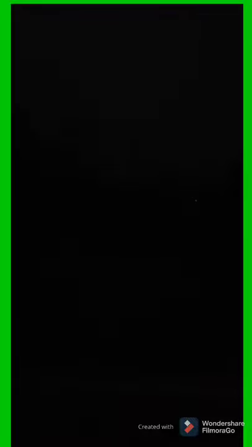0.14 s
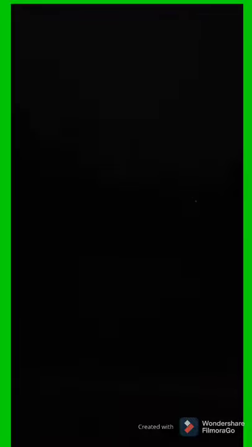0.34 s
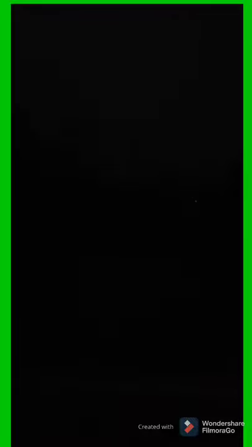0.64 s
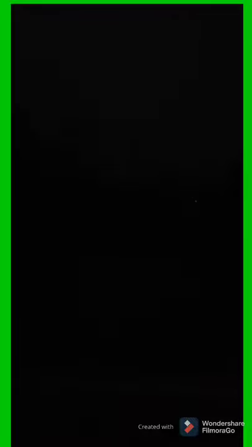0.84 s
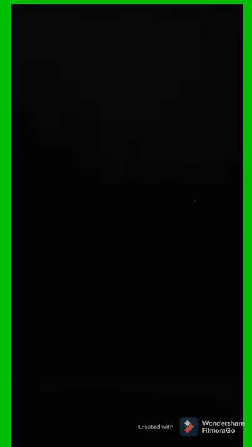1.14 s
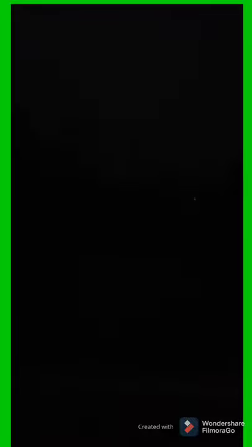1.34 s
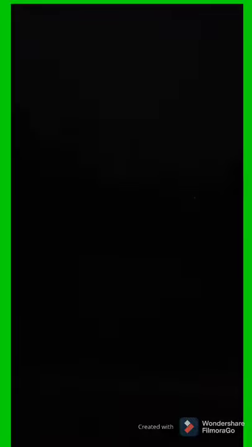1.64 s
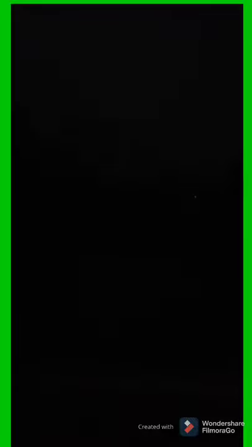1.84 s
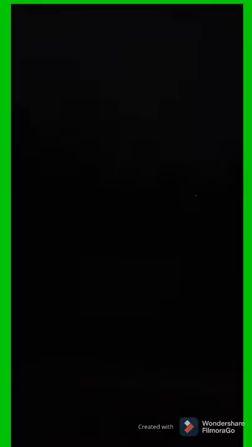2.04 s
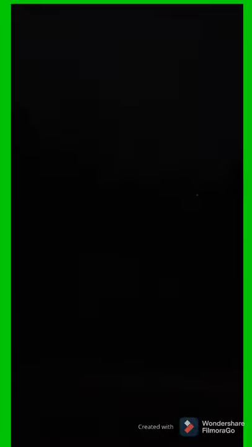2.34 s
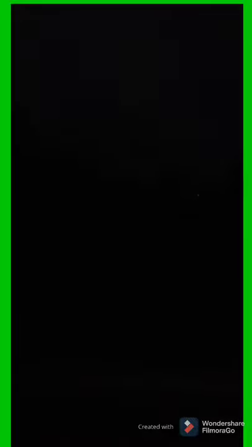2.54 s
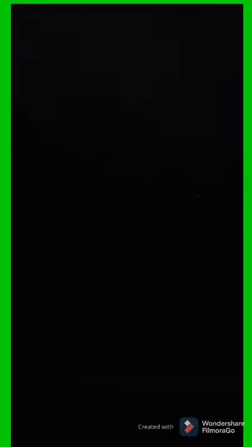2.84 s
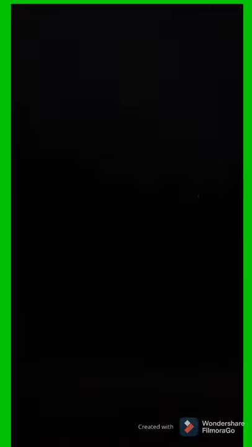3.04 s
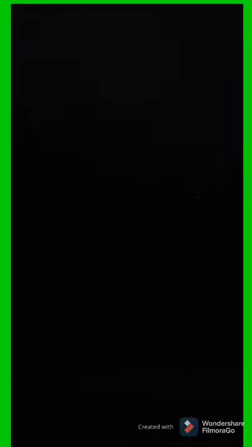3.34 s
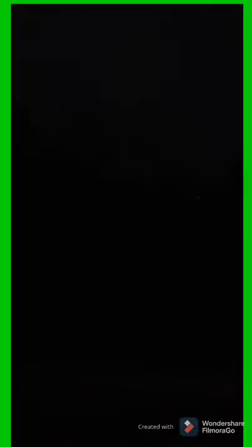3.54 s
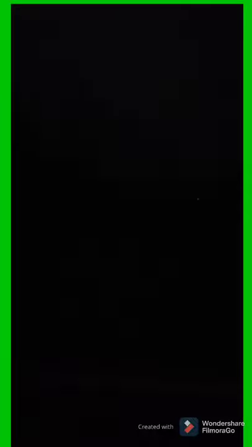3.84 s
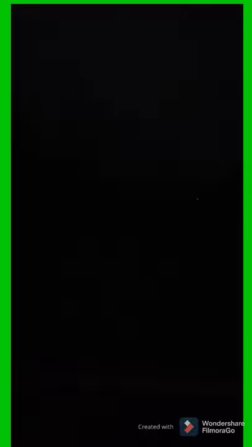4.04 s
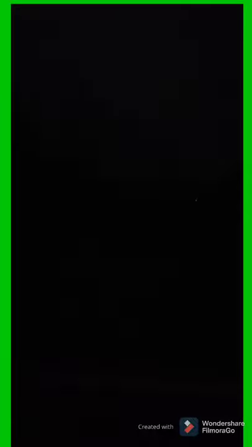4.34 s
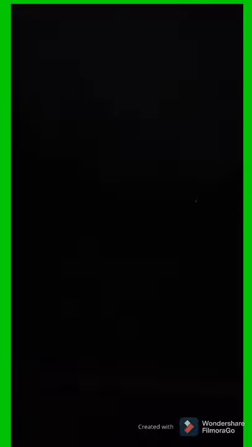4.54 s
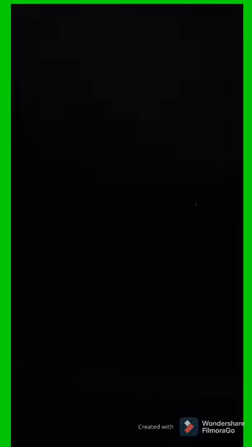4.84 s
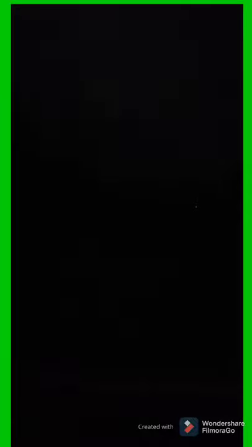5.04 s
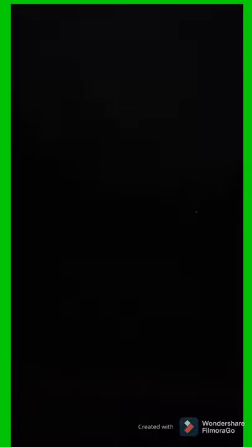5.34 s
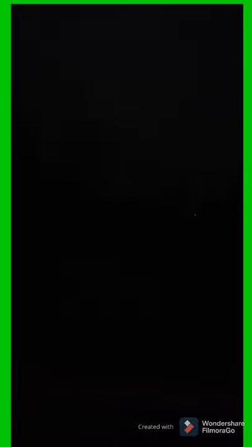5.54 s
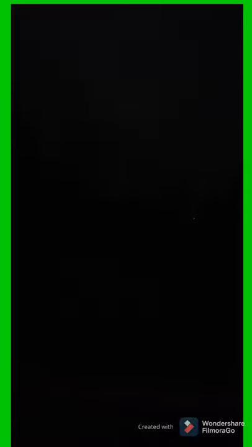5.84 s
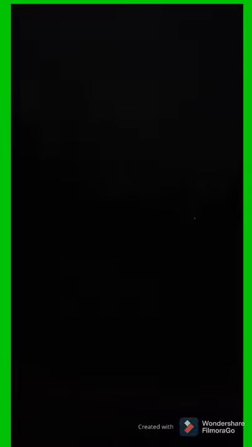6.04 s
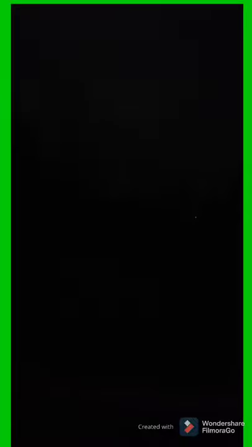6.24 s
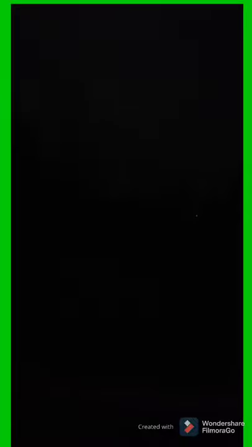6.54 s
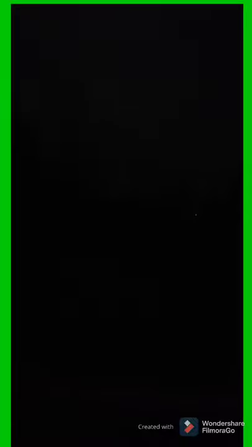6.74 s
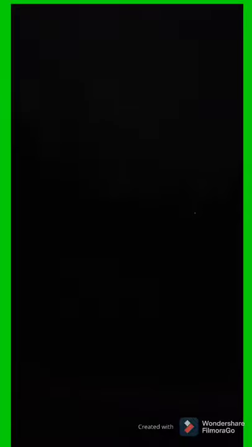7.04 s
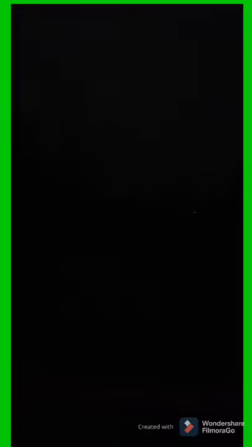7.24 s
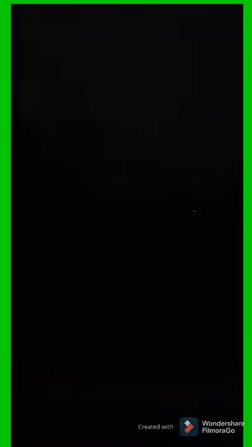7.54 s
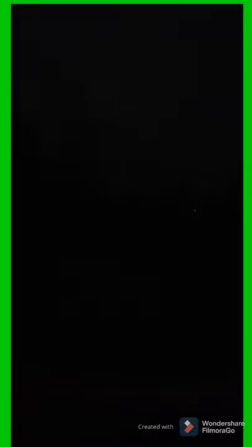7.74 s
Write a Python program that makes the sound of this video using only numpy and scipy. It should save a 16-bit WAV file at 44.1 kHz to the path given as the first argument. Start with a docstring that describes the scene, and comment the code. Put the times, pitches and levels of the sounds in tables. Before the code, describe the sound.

A pack of coyotes howls, yips and barks some way off at night, echoing briefly over a steady low hum.

```python
"""Coyotes at night

A pack some way off, a little left of a small two-port microphone. Long wavering howls, nearly pure
tones of the vocal folds, overlap with arched yips and with barks, hoarse where the folds beat unevenly.
The surroundings throw back a short echo. Underneath lie a mains hum from the right, a low rumble
of night air, a few soft bumps close by and the microphone's own hiss."""
import sys
import numpy as np
from scipy import signal
from scipy.fft import rfft, irfft, next_fast_len
from scipy.io import wavfile

SR = 44100
rng = np.random.default_rng(int(sys.argv[2]) if len(sys.argv) > 2 else 0)


def unload_wav(signal):
    """Save mono or channel-first audio to the path in sys.argv[1] as 16-bit WAV at rate SR, clipped to [-1, 1]."""
    wavfile.write(
        sys.argv[1],
        SR,
        np.round(np.clip(np.atleast_2d(signal).T, -1, 1) * 32767).astype(np.int16),
    )


N = 347803

# the course of each howl: (time [s], pitch [Hz], fundamental [dB], second harmonic [dB])
OPENING_HOWL = [(0.0, 634, -33.5, -57), (0.17, 606, -46, -61), (0.255, 613, -45, -50.5),
                (0.29, 628, -36.5, -45), (0.31, 695, -41.5, -53)]
WAVERING_HOWL = [(0.37, 530.0, -76, -52), (0.41, 501, -72.0, -55), (0.48, 486.7, -72, -47),
                 (0.62, 538, -61, -72), (0.77, 487, -54.5, -48), (0.92, 546, -54.0, -61),
                 (1.04, 491, -77, -63), (1.1, 541, -60, -51.5), (1.24, 487, -67, -58.5),
                 (1.29, 519, -63, -44.5), (1.36, 497.4, -67.0, -49), (1.47, 541, -47, -56.5),
                 (1.55, 542, -48.5, -62)]
LEAD_HOWL = [(2.975, 698.2, -42.5, -54), (3.04, 745.2, -35, -65), (3.19, 707.6, -38.5, -57),
             (3.37, 684.6, -35, -48), (3.8, 706.0, -34.5, -57), (3.89, 728.0, -29.5, -59.5),
             (3.98, 752.0, -42.5, -68.5), (4.06, 737, -31.5, -58.5), (4.34, 683, -34, -57),
             (4.56, 729, -32.5, -71), (4.68, 709, -34.5, -56), (4.8, 705.3, -37.5, -66),
             (4.9, 685, -54, -92)]
FALLING_HOWL = [(4.81, 756.5, -46, -86), (4.85, 902, -39, -58.5), (4.9, 889, -42.5, -57.5),
                (4.97, 785, -48, -58), (5.11, 745, -35.5, -63), (5.24, 693, -35.5, -61.5),
                (5.34, 636.0, -42.5, -43), (5.42, 580.5, -41, -75), (5.55, 526, -55.5, -65.5),
                (5.68, 488.0, -58, -51.5), (5.77, 487.0, -54, -61.5), (5.89, 500.8, -53.5, -45.5),
                (6.13, 464.0, -58, -57), (6.24, 480.5, -61, -62), (6.4, 446.7, -52.0, -49.5),
                (6.53, 448, -50.5, -56), (6.72, 499, -67, -67)]
CLOSING_HOWL = [(6.92, 502.7, -76.0, -61), (7.02, 445.6, -52, -53), (7.12, 500, -58, -58),
                (7.18, 491.0, -59.0, -53.5), (7.24, 475, -56, -45.5), (7.29, 452, -55, -71.5),
                (7.39, 416, -55, -65), (7.46, 396, -67.5, -78)]
# howls: (course [table], third harmonic at the start [dB re fundamental], at the end [dB re fundamental],
# share of the overtones scattered on the way [0-1], echo send [dB])
HOWLS = [(OPENING_HOWL, -51, -46, 0.11, -1), (WAVERING_HOWL, -17, -28, 0.5, 4.3),
         (LEAD_HOWL, -30, -54.5, 0.13, -1), (FALLING_HOWL, -45.5, -21, .4, 1),
         (CLOSING_HOWL, -26, -30, 0.56, 1.5)]
# yips: (crest time [s], length [s], crest pitch [Hz], arch depth [0-1], level [dB],
# second harmonic [dB re fundamental], roughness [0-1])
YIPS = [(0.319, 0.13, 749, 0.31, -46.5, -5.5, .33), (0.345, 0.053, 655, 0.05, -39.5, -10.5, 0),
        (0.628, .11, 711.5, .14, -49.5, -1, 0.36), (0.955, .11, 623.7, 0.05, -42, -2.5, 0.08),
        (1.595, 0.11, 704, 0.25, -47, -4, 0.3), (1.771, 0.13, 714, .22, -50, -0.5, 0.38),
        (1.957, 0.076, 700.6, 0.2, -51.5, 1, 0.3), (2.043, 0.071, 562, .08, -55, -6.5, 0.2),
        (2.926, 0.096, 584.5, 0.06, -54.5, 12.5, 0.25), (2.97, .06, 607.5, .02, -47, 15.5, 0.01),
        (3.209, 0.074, 649, .12, -52, 11, 0.23), (6.781, 0.13, 661, 0.1, -62, 3.5, 0.4),
        (6.84, 0.092, 553, 0.16, -55, 1.5, 0.5), (7.127, .09, 622, 0.1, -66.5, 9, .35)]
# the narrow throat in a yip: (frequency [Hz], gain [dB])
YIP_THROAT = [(250, -13.5), (500, 3), (1420, -1.5), (1580, -12), (2200, -22)]
# barks: (crest time [s], length [s], crest pitch [Hz], arch depth [0-1], level [dB],
# brightness [dB/octave], roughness [0-1])
BARKS = [(2.376, .16, 785, .36, -33.5, 1.5, 0.65), (2.4, 0.053, 700, .08, -37.5, -10, 0.08),
         (2.561, .1, 608, .16, -31, -4, 0.3), (2.60, .155, 803, 0.44, -30.5, 5.5, 0.6),
         (2.677, .1, 660, 0.14, -36, 2, .4), (2.741, 0.11, 918, 0.16, -36, 1, .3),
         (2.792, .145, 704, .36, -34.5, 0.5, 0.7), (2.945, 0.17, 795, .06, -51, 21, 0.3),
         (4.158, .17, 726, .36, -34, -3.5, .45), (4.367, .2, 650, 0.38, -33.5, -4.5, 0.45),
         (4.891, .13, 910, .08, -45.5, 6, 0.07), (5.416, 0.4, 619, .1, -57, 6.5, 0.58),
         (7.72, .32, 573, .08, -69.5, 12, 0.56)]
# the open throat in a bark, dulled by distance: (frequency [Hz], gain [dB])
BARK_THROAT = [(150, -34.5), (350, -20), (500, 0.5), (640, 6), (850, 4), (1200, 2.5), (1500, -6),
               (1720, -5), (2000, -18), (2250, -17), (2560, -31.5), (3600, -59.5)]
# ring of the surroundings: (frequency [Hz], time to fall 60 dB [s])
RING_TIMES = [(300, 1), (700, 1.93), (1400, 1.1), (3000, 0.8)]
# mains hum: (harmonic [number], level [dB])
HUM = [(1, -36.5), (2, -57), (3, -60.5), (4, -55.5), (5, -64.5)]
# night air: (frequency [Hz], relative density [dB])
NIGHT_AIR = [(20, -13.5), (40, -8.5), (62, 4), (90, -1), (160, -5), (230, -10.5), (320, -11), (430, -14.5),
             (600, -15), (800, -20), (1000, -30.5), (1400, -37.5), (2000, -44.5), (5000, -63.5)]
# how alike the air is at the two ports: (frequency [Hz], coherence [0-1])
AIR_COHERENCE = [(25, 0.8), (70, 0.04), (290, 0.8), (640, 0.7), (1400, 0.94), (3000, 0.2)]
# bumps near the microphone: (time [s], level [dB], pitch [Hz], decay [s], left minus right [dB])
BUMPS = [(1.551, -21, 83.5, 0.0084, -18), (1.565, -34, 42, 0.022, -12), (4.06, -35, 60.2, 0.069, -7),
         (4.155, -31, 63.5, 0.051, -8.5), (4.24, -33, 40, .06, -5.5), (6.63, -36, 56, 0.033, -5)]
# microphone hiss: (frequency [Hz], relative density [dB])
MIC_HISS = [(100, 3), (2500, 1), (4500, -0.5), (6000, -3.5), (8300, -10), (10000, -7.5), (12500, 0.5),
            (16000, -1.5)]
# a narrow band of electrical hiss on the left: (frequency [Hz], relative density [dB])
SIZZLE = [(5900, -37), (6250, -7.5), (6700, -5.5), (7150, -2), (7700, -8), (8200, -27.5)]
# that band's slow drift: (time [s], level [dB])
SIZZLE_LEVEL = [(0.5, -64.5), (1.4, -66), (7.89, -67)]


def howl(course, third_start_db, third_end_db, scattered, trim_db=0.76, flutter_hz=8, scatter_hz=24):
    """A nearly pure voice of three harmonics; it flutters, and the upper two blur on their way here."""
    times, *columns = np.transpose(course)
    t = np.arange(times[0], times[-1], 1 / SR)
    size = len(t)
    hz, first_db, second_db = (np.interp(t, times, c) for c in columns)
    mouth_db = 13 / (1 + ((3 * hz - 2098) / 35) ** 2)  # a mouth resonance lifts the third harmonic
    third_db = first_db + np.linspace(third_start_db, third_end_db, size) + mouth_db
    phase = folds(hz, jitter=0.0021, jitter_hz=61.4)
    voice = gain_of(first_db + 1.8 * waver(size, flutter_hz)) * np.sin(phase)
    for k, db in enumerate([second_db, third_db], 2):
        stray = waver(size, scatter_hz) + 1j * waver(size, scatter_hz)
        paths = np.sqrt(1 - scattered) + np.sqrt(scattered / 2) * stray
        flutter = unit_rms(gain_of(2.5 * waver(size, flutter_hz)))
        voice += gain_of(db) * flutter * (paths * np.exp(1j * k * phase)).imag
    rasp = 1 + 0.075 * waver(size, 470)
    fades = signal.windows.tukey(size, 0.016 * SR / size)
    return times[0], np.sqrt(2) * gain_of(trim_db) * voice * rasp * fades


def yip(crest, length, crest_hz, depth, db, second_db, rough, rasp=2.5, clear_db=4):
    """A short arched note of two harmonics: it cracks on the way up and rings clearer on the way down."""
    start, hz, swell = arch(crest, length, crest_hz, 0.9 * depth, depth, rise_share=0.42, edge_db=-4.5)
    size = len(hz)
    after_crest_s = start + np.arange(size) / SR - crest
    clear = np.clip(after_crest_s / 0.024, 0, 1)
    crack = rough * np.sqrt(swell) * (1 - 0.49 * clear)
    phase = folds(hz, jitter=0.08 * crack, jitter_hz=131)
    levels = [db, db + second_db + clear_db * (clear - 0.5)]
    voice = sum(gain_of(level) * np.sin(k * phase) * unit_rms(1 + rasp * crack * waver(size, 260))
                for k, level in enumerate(levels, 1))
    throat = gain_of(curve_at(YIP_THROAT, np.fft.rfftfreq(size, 1 / SR)))
    return start, np.sqrt(2) * irfft(rfft(swell * voice) * throat, size)


def bark(crest, length, crest_hz, depth, db, bright_db, rough, breath=0.6, rasp=0.84, opening_db=14):
    """At full effort the folds beat unevenly, in threes: frayed, split lines coloured by the throat."""
    start, hz, swell = arch(crest, length, crest_hz, depth, 0.6 * depth, rise_share=0.47, edge_db=-13)
    size = len(hz)
    swell *= np.minimum(np.linspace(0, 1, size) / 0.082, 1)  # soft attack
    phase = folds(hz, jitter=0.04 * rough, jitter_hz=119)
    hoarse = np.clip(rough * np.sqrt(swell), 0, 1)
    rushing_air = unit_rms(waver(size, 3800) * (1 + 2.1 * np.cos(phase)))
    drive = breath * hoarse * rushing_air
    for k in range(1, 6):
        fray = unit_rms(1 + rasp * k * hoarse * waver(size, 160))  # higher harmonics fray more
        beat = 1 + 2 * hoarse * np.cos(phase / 3 + 1.5 * waver(size, 35))
        drive += np.cos(k * phase + 2 * np.pi * rng.random()) * fray * beat / np.sqrt(k)
    f = np.fft.rfftfreq(size, 1 / SR)
    throat_db = curve_at(BARK_THROAT, f) + bright_db * np.log2(np.clip(f, 500, 2000) / 1000)
    spectrum = rfft(swell * drive) * gain_of(throat_db)
    # the treble grows as the jaws open
    treble = np.clip((f - 1100) / 900, 0, 1)
    jaws = gain_of(opening_db * np.minimum(np.linspace(-1, 1, size), 0.25))
    voice = irfft(spectrum * (1 - treble), size) + jaws * irfft(spectrum * treble, size)
    return start, gain_of(db) * unit_rms(voice) * np.sqrt(np.mean(swell ** 2))


def folds(hz, jitter, jitter_hz):
    """Phase of vocal folds whose pitch trembles."""
    return 2 * np.pi * np.cumsum(hz * (1 + jitter * waver(len(hz), jitter_hz))) / SR


def arch(crest, length, crest_hz, climb, sink, rise_share, edge_db):
    """Start time, pitch and loudness of a short call that climbs to a crest and sinks again."""
    rise, fall = length * rise_share, length * (1 - rise_share)
    t = np.arange(-rise, fall, 1 / SR)
    bend = np.sin(np.pi / 2 * np.where(t < 0, t / rise, t / fall)) ** 2
    hz = crest_hz * (1 - np.where(t < 0, climb, sink) * bend)
    swell = gain_of(edge_db * bend) * signal.windows.tukey(len(t), 0.2)
    return crest - rise, hz, swell


def pack(yip_send_db=4, bark_send_db=6):
    """All the voices at the microphone; those from farther back carry more echo."""
    direct, thrown = np.zeros(N), np.zeros(N)
    voices = [(howl(*row), send_db) for *row, send_db in HOWLS]
    voices += [(yip(*row), yip_send_db) for row in YIPS]
    voices += [(bark(*row), bark_send_db) for row in BARKS]
    for (start, sound), send_db in voices:
        add(direct, start, sound)
        add(thrown, start, gain_of(send_db) * sound)
    return ports(direct + echoes(thrown))


def echoes(x, early_db=-8.5, early_s=0.041, tail_db=-17, taps_per_s=2000):
    """Nearby surfaces answer at once and distant ones leave a thin tail, differently at each port."""
    t = np.arange(SR) / SR
    taps = rng.standard_normal((2, SR)) * (rng.random((2, SR)) < taps_per_s / SR) * (t > 0.003)
    early = taps * np.exp(-t / early_s)
    hz, frame_s, bands = signal.stft(taps[:, ::-1] * np.minimum(t / 0.1, 1), SR, nperseg=256)
    decay = gain_of(-60 * frame_s / curve_at(RING_TIMES, hz)[:, None])
    tail = signal.istft(bands * decay, SR, nperseg=256)[1][:, :SR]
    response = (gain_of(early_db) * unit_rms(early) + gain_of(tail_db) * unit_rms(tail)) / np.sqrt(SR)
    return signal.fftconvolve(x[None], response, axes=1)[:, :N]


def ports(x, lead_s=0.00005):
    """The pack is a little to the left: that port hears it sooner, and brighter."""
    hz = np.fft.rfftfreq(N, 1 / SR)
    side_db = curve_at([(400, 4.5), (720, -2), (1150, 4.5), (2200, 2.0)], hz) / 2
    tilt = gain_of(side_db) * np.exp(1j * np.pi * hz * lead_s)
    return irfft(rfft(x) * np.array([tilt, 1 / tilt]), N)


def mains_hum(hz=120.02, left_lag_s=0.00032, overtone_waver=0.22):
    """A steady mains hum from the right, whose overtones waver."""
    phase = 2 * np.pi * hz * (np.arange(N) / SR - np.array([[left_lag_s], [0]]))
    hum = np.zeros((2, N))
    for k, db in HUM:
        tone = gain_of(db) * np.sin(k * phase + 2 * np.pi * rng.random())
        hum += tone * (1 + overtone_waver * (k > 1) * waver(N, 6.3))
    return np.sqrt(2) * hum


def night_air(db=-46):
    """The low rumble of the place, partly shared by the two ports."""
    alike = curve_at(AIR_COHERENCE, np.fft.rfftfreq(N, 1 / SR))
    shared = np.sqrt(alike) * rfft(noise(NIGHT_AIR))
    separate = np.sqrt(1 - alike) * rfft([noise(NIGHT_AIR), noise(NIGHT_AIR)])
    return gain_of(db) * irfft(shared + separate, N)


def bumps(rise_s=0.0044):
    """Dull, quickly damped thuds near the microphone, stronger at the right port."""
    out, t = np.zeros((2, N)), np.arange(SR // 4) / SR
    for s, db, hz, decay, side_db in BUMPS:
        thud = np.sin(2 * np.pi * hz * t) * np.exp(-t / decay) * (1 - np.exp(-t / rise_s))
        add(out[0], s, gain_of(db + side_db / 2) * thud)
        add(out[1], s, gain_of(db - side_db / 2) * thud)
    return out


def microphone_hiss(db=-67.5, drift_hz=5):
    """Each port's own hiss, with a drifting band of electrical sizzle on the left."""
    hiss = gain_of(db + 0.1 * waver(N, drift_hz)) * np.array([noise(MIC_HISS), noise(MIC_HISS)])
    sizzle_db = np.interp(np.arange(N) / SR, *np.transpose(SIZZLE_LEVEL)) + 0.96 * waver(N, drift_hz)
    hiss[0] += gain_of(sizzle_db) * noise(SIZZLE)
    return hiss


def noise(points):
    """Steady noise with the given spectral shape."""
    size = next_fast_len(N)
    shape = gain_of(curve_at(points, np.fft.rfftfreq(size, 1 / SR)))
    return unit_rms(irfft(rfft(rng.standard_normal(size)) * shape, size)[:N])


def waver(size, rate_hz):
    """Smooth random motion up to about the given rate."""
    length = next_fast_len(size + SR)
    lowpass = np.exp(-(np.fft.rfftfreq(length, 1 / SR) / rate_hz) ** 2)
    return unit_rms(irfft(rfft(rng.standard_normal(length)) * lowpass, length))[:size]


def gain_of(db):
    """Decibels to a factor."""
    return 10 ** (np.asarray(db) / 20)


def unit_rms(x):
    """Scales to an rms of one."""
    return x / np.sqrt(np.mean(x ** 2) + 1e-20)


def curve_at(points, hz):
    """Interpolates a table on a log-frequency axis."""
    f, value = np.transpose(points)
    return np.interp(np.log(hz + 1), np.log(f + 1), value)


def add(mix, s, sound):
    """Mixes a sound in at time s."""
    part = mix[max(round(s * SR), 0):][:len(sound)]
    part += sound[:len(part)]


def scene():
    """The distant pack over the night's background."""
    return pack() + mains_hum() + night_air() + microphone_hiss() + bumps()


def record(dry, edge_hz=15800):
    """The recorder's band limit."""
    lowpass = signal.firwin(511, edge_hz, window=("kaiser", 9), fs=SR)
    return signal.oaconvolve(dry, lowpass[None], "same")


dry = scene()
out = record(dry)
unload_wav(out)
```